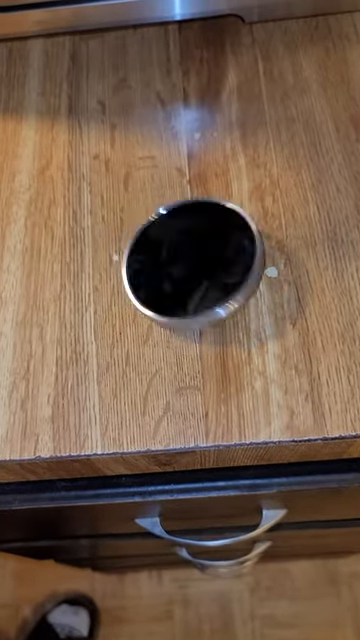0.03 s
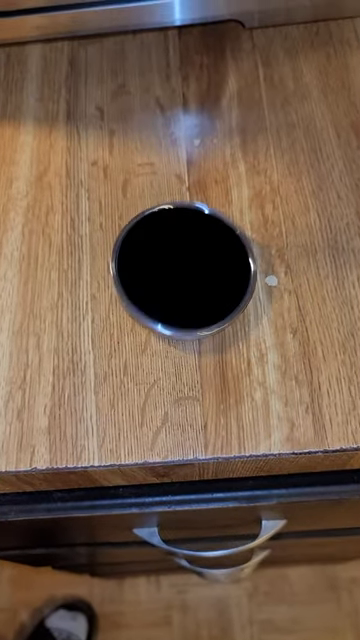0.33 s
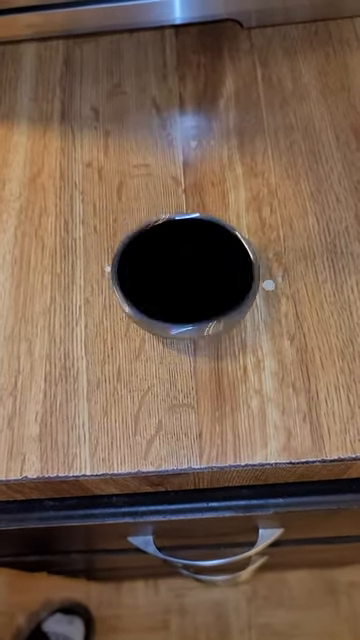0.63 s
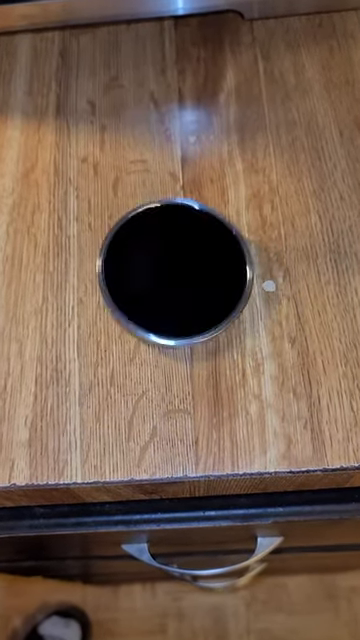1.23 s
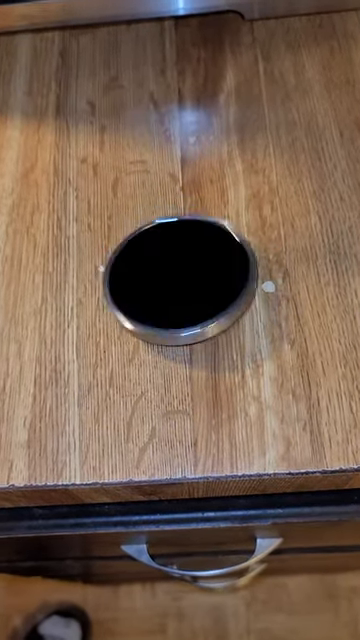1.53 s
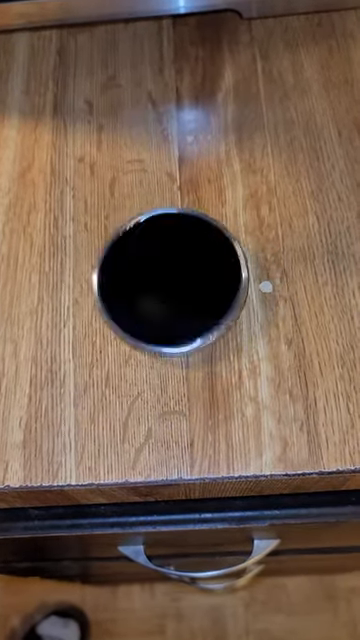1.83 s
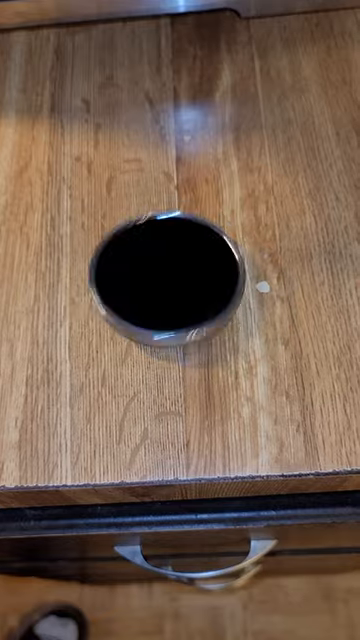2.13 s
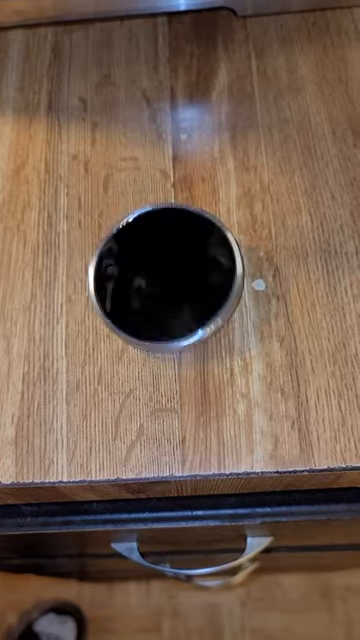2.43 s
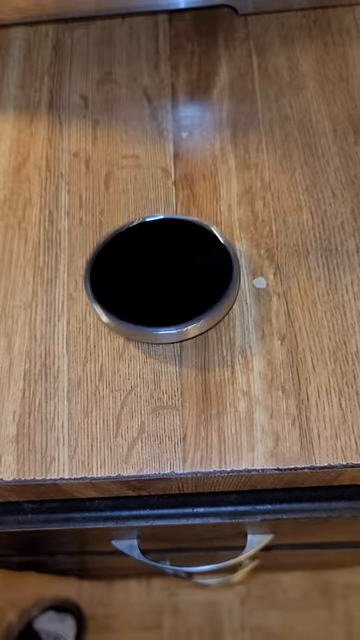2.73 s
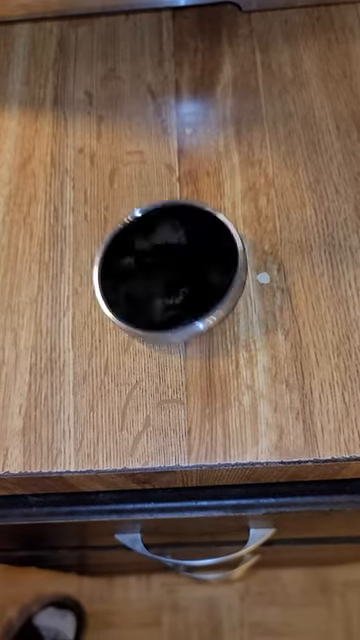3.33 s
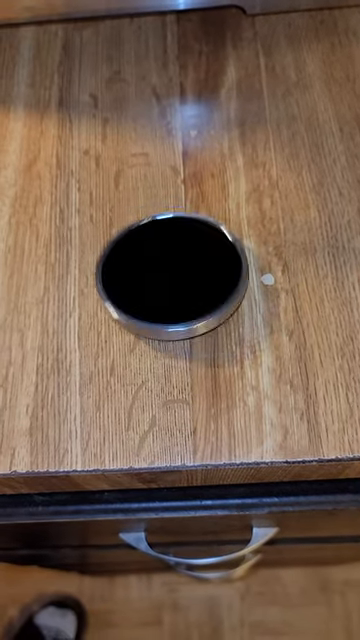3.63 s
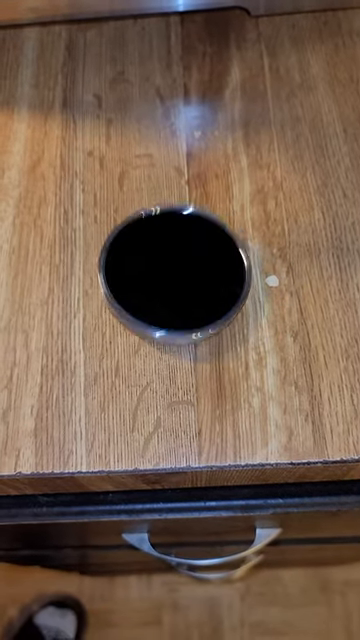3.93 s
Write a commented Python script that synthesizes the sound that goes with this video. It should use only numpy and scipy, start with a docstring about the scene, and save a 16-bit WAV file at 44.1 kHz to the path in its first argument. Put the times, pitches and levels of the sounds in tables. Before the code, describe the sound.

A heavy metal disc is already wobbling on its rim on a wooden cabinet top, grinding and ringing in about nine pulses a second. The rim knocks irregularly, brightest near 1.3 seconds and strongest near 2.1 seconds. The cabinet booms softly underneath, with a faint electrical hum in the quiet room. By 4 seconds the wobble has quickened to about ten pulses a second and is still going.

```python
"""Over the mains hum of a quiet room, a heavy metal disc is already wobbling round on its rim on a wooden
cabinet top, about nine laps a second. The contact point grinds over the grain and rings board and disc,
swelling and brightening on every lap, while the cabinet booms softly under the weight. Now and then the
rim knocks on a bump, brightest near 1.3 s and strongest near 2.1 s. By the end of the four seconds the
wobble has quickened to about ten laps a second."""
import sys
import numpy as np
from scipy import signal
from scipy.fft import rfft, irfft, next_fast_len
from scipy.io import wavfile
from scipy.ndimage import uniform_filter1d, minimum_filter1d, map_coordinates

SR = 44100
rng = np.random.default_rng(int(sys.argv[2]) if len(sys.argv) > 2 else 0)


def transcribe(signal):
    """Save signal, clipped to [-1, 1], as a 16-bit WAV file at the path in sys.argv[1]."""
    frames = np.atleast_2d(signal).T
    limited = np.clip(frames, -1, 1)
    pcm = np.round(limited * 32767).astype(np.int16)
    wavfile.write(sys.argv[1], SR, pcm)


N = 176400

# mains hum partials (frequency [Hz], level [dB])
HUM = [(119.9, -48.5), (239.8, -62)]
# room tone EQ (frequency [Hz], gain [dB])
AIR_EQ = [(30, 7.5), (200, -12), (1000, -15), (5000, -44), (15000, -40)]
# reverb decay (frequency [Hz], time to fall 60 dB [s])
REVERB_DECAY = [(200, 0.55), (1500, 0.35), (10000, 0.25)]
# envelope of the cabinet's boom (time [s], level [dB])
BOOM_ENVELOPE = [(0.0, -45.5), (0.49, -44.5), (0.51, -45), (1.12, -45), (1.19, -48.5), (1.7, -42),
                 (2.05, -52.5), (2.19, -39.5), (2.24, -49), (2.36, -38), (2.48, -62), (2.52, -43),
                 (3.36, -47.5), (3.4, -52), (3.44, -37), (3.5, -48), (3.95, -44), (4.0, -66)]
# tone of the boom (frequency [Hz], gain [dB])
BOOM_EQ = [(20, -22), (38, -13), (48, -13), (57, 3), (68, -8), (90, -13.5), (140, -20), (300, -31),
           (700, -46), (2000, -120)]
# broad tone of the rolling contact (frequency [Hz], gain [dB])
ROLL_EQ = [(40, -33), (150, -21.5), (230, -17), (400, -21.5), (580, -21.5), (720, -13), (790, -0.25),
           (1500, 0.35), (1850, -5), (2600, -22.5), (4600, -35), (6800, -35), (8000, -46), (15500, -56)]
# resonances of the wooden top (frequency [Hz], width [Hz], left boost [dB], right boost [dB])
BOARD_MODES = [(453.5, 120, 8.5, 13.5), (641, 107, 8.5, 13.5), (729, 17, -4, 6), (774.1, 29.6, 4.3, 9.5),
               (786, 10.5, 9.5, -0.5), (968, 42, 13.5, 4), (1072, 57, 1.5, 7.5), (1263, 75, 1, 7),
               (1346.5, 83, 4, 8), (1498, 122, 11, 6.5), (1681, 73, 5.5, -1), (1760, 24, -2.5, -20.5),
               (1821, 23, 10, 11), (2164, 86, 5.5, 4)]
# resonances of the disc (frequency [Hz], width [Hz], left boost [dB], right boost [dB])
DISC_MODES = [(2886, 95, 2.3, 12.6), (5178, 280, 8.5, 19.2), (8685, 150, 9, 14.5), (11200, 120, 21.3, 18)]
# the rim hits a bump (time [s], level [dB], hardness as treble boost [dB])
KNOCKS = [(.046, -5.5, -1.5), (0.1878, 4, 0), (.2875, 1.5, 0), (.3765, 0.5, -3.5), (.5135, 2, -2),
          (.639, 3.5, -5.5), (0.7151, 4, -6.5), (0.7316, 6.5, -3.5), (.742, 3, -2.5), (1.092, 4.5, 1.5),
          (1.1875, 6.5, 4), (1.29, 4.5, 7), (1.292, 8.5, 9.5), (1.296, -2, 1.5), (1.619, -1.5, -1),
          (1.6255, 4, 2.5), (1.7019, 6.5, -4), (1.728, 1.5, 4), (1.832, -4.5, 6), (1.937, -13, -2),
          (2.133, 11, -6), (2.141, 7, -3), (2.4675, 5.5, -4.5), (2.757, -1, 5.5), (2.985, 3.5, 3.5),
          (2.989, 1.5, -3.5), (3.394, 0, 1.5), (3.4765, 2.5, -1), (3.879, 4, -2), (3.9651, 1, 1.5)]
# tone of a knock (frequency [Hz], gain [dB])
KNOCK_EQ = [(300, -17), (620, -1), (850, -6), (1150, -5.5), (1500, 2.5), (2500, 4.5), (3500, -4.5),
            (6000, -7.5), (11200, -2), (16000, -3)]
# high shelf for hard knocks (frequency [Hz], share of the boost [0-1])
HARDNESS_SHELF = [(1500, 0), (2400, 1)]
# laps of the contact point (time of the peak [s], roll level [dB], grit level [dB])
LAPS = [(0.08, -2.5, -0.5), (0.192, -5.2, -3), (0.302, -1.5, 2.5), (0.414, -2.5, -1), (0.529, -3.5, 0),
        (0.643, -1.2, 1.2), (0.745, -0.5, -1), (0.86, -4, 0.5), (0.973, -1.5, -0.2), (1.09, -3.3, 0.5),
        (1.193, -2.3, 2), (1.303, -0.3, -0.5), (1.412, -4, -1), (1.524, 1, -1.5), (1.629, -3.7, -0.5),
        (1.732, 0.4, 2.5), (1.84, -3.7, 1), (1.951, 1.8, -2), (2.058, 2.1, -0.5), (2.164, 0.5, 1.3),
        (2.266, -3, -0.5), (2.364, 1.1, -0.5), (2.481, 0.6, -1.2), (2.585, 3.6, -0.5), (2.686, -4.8, 1),
        (2.782, -2.5, 0), (2.891, -1.6, 0), (2.994, -2.3, 1.2), (3.091, -2, 2), (3.187, -1.6, -0.3),
        (3.298, -1.2, -1), (3.397, 1.7, -1), (3.496, -0.4, 0.5), (3.59, -2.8, 0.5), (3.695, 0, -0.0),
        (3.799, -1.5, 1.5), (3.891, 0.5, 0.1), (3.987, -4, 4)]
# swell from the quiet side of a lap to the loud side (frequency [Hz], depth [dB])
SWELL = [(300, -1), (480, 6), (650, 0.5), (850, -1.5), (1120, 14.5), (1380, 11.5), (1720, 5), (2200, 21.5),
         (2650, 5), (5000, 13), (11000, 12)]
# resonances swept by each lap (quiet side [Hz], loud side [Hz], width [Hz], boost [dB])
SWEEPS = [(745, 1150, 42, 10), (1900, 1800, 94, 3.5), (5200, 5090, 140, 7.5)]
# stereo image of the grinding (frequency [Hz], left-right correlation [0-1])
STEREO_IMAGE = [(200, 0.68), (600, 0.3), (900, 0.91), (1600, 0.99), (2100, 0.07), (3500, 0.05),
                (7000, 0.15), (14000, 0)]

AIR_DB, BOOM_TRIM_DB, DISC_DB, REVERB_DB = -54, 3, -19.5, -15.5
ROUGH_DB, BUMPS_PER_S, PATCHY_DB = 1.35, 230, 2.5  # unevenness of the wood
SPECKS_PER_S, SPECK_SIZE = 120, 2.55  # size against the grinding
GRIT_LEAD_S, SWELL_SHARPNESS = 0.0044, 0.16  # the grit peaks ahead of the roll
SWEEP_CURVE = 1.27  # above 1 the sweeps linger on the quiet side
KNOCK_DB, SCRAPE_DECAY_S, KNOCK_SCRAPE, KNOCK_THUD = 24, 0.0029, 1.17, 0.81
LEFT_LAG_S = 0.00025  # the sound reaches the left microphone later


def amp(db):
    """Decibels to gain."""
    return 10 ** (np.asarray(db) / 20)


def unit(x):
    """Normalise to rms 1."""
    return x / np.sqrt(np.mean(x ** 2) + 1e-20)


def along(points, hz):
    """Read a curve on a log frequency axis."""
    f, v = np.transpose(points)
    return np.interp(np.log(hz + 1), np.log(f + 1), v)


def bell(hz, centre, width):
    """A resonance peak of height 1."""
    return 1 / (1 + (2 * (hz - centre) / width) ** 2)


def smooth_noise(rate):
    """A smooth random curve, rate knots a second."""
    return map_coordinates(rng.standard_normal(N // 8), [np.arange(N) * rate / SR], mode="wrap")


def filtered(x, response):
    """Run x through a frequency response."""
    size = 2 * next_fast_len(N // 2 + SR // 4)
    return irfft(rfft(x, size) * response(np.fft.rfftfreq(size, 1 / SR)), size)[..., :N]


def minimum_phase(gain):
    """The response with this gain that rings only after a hit."""
    cepstrum = irfft(np.log(np.maximum(gain, 1e-6)))
    half = cepstrum.shape[-1] // 2
    cepstrum[..., 1:half] *= 2
    cepstrum[..., half + 1:] = 0
    return np.exp(rfft(cepstrum))


def room_tone():
    """A steady bed of mains hum and faint air."""
    t = np.arange(N) / SR
    hum = sum(amp(db) * np.sqrt(2) * np.sin(2 * np.pi * (hz * t + rng.random())) for hz, db in HUM)
    air = unit(filtered(rng.standard_normal((2, N)), lambda hz: amp(along(AIR_EQ, hz))))
    return hum + amp(AIR_DB) * air


def reverb(x):
    """The room's short stereo tail, the highs dying first."""
    hz, t, noise = signal.stft(rng.standard_normal((2, SR // 2)), SR, nperseg=256)
    decay = amp(-60 * t / along(REVERB_DECAY, hz)[:, None])
    tail = signal.istft(noise * decay, SR, nperseg=256)[1]
    return signal.fftconvolve(x, tail / np.linalg.norm(tail[0]), axes=1)[:, :N]


def cabinet_boom():
    """The low end: the cabinet's lowest resonance, shaken by the rolling weight."""
    times, db = np.transpose(BOOM_ENVELOPE)
    rumble = unit(filtered(rng.standard_normal(N), lambda hz: amp(along(BOOM_EQ, hz))))
    return rumble * amp(BOOM_TRIM_DB + np.interp(np.arange(N) / SR, times, db))


def board_and_disc(hz):
    """The ringing response of wood and metal at each microphone."""
    boost_db = sum(np.array([[left], [right]]) * bell(hz, centre, width)
                   for centre, width, left, right in [*BOARD_MODES, *DISC_MODES])
    gain = amp(along(ROLL_EQ, hz) + boost_db)
    ring_phase = np.angle(minimum_phase(np.sqrt(gain[0] * gain[1])))
    lag_phase = np.array([[-1], [1]]) * np.pi * hz * LEFT_LAG_S
    return gain * np.exp(1j * (ring_phase + lag_phase))


def rim_knocks():
    """The rim hits bumps, each a thud with a little scrape; harder hits are brighter."""
    out, t = np.zeros(N + SR), np.arange(SR // 10) / SR
    hz = np.fft.rfftfreq(len(t), 1 / SR)
    for start, db, hard_db in KNOCKS:
        scrape = rng.standard_normal(len(t)) * np.exp(-t / SCRAPE_DECAY_S)
        hit = KNOCK_SCRAPE * scrape / np.linalg.norm(scrape) + KNOCK_THUD * (t == 0)
        tone = minimum_phase(amp(along(KNOCK_EQ, hz) + hard_db * along(HARDNESS_SHELF, hz)))
        out[round(start * SR):][:len(t)] += amp(db + KNOCK_DB) * irfft(rfft(hit) * tone)
    return out[:N]


def lap_motion(hz, t):
    """Gain in dB as the contact point circles: each lap swells and sweeps the resonances."""
    peaks, roll_db, grit_db = np.transpose(LAPS)
    grit = along([(1500, 0.36), (6000, 0.85)], hz)  # the grit's share grows with frequency
    level = (1 - grit) * np.interp(t, peaks, roll_db) + grit * np.interp(t, peaks, grit_db)
    padded = np.r_[2 * peaks[0] - peaks[1], peaks, 2 * peaks[-1] - peaks[-2]]
    laps = np.interp(t + GRIT_LEAD_S * (grit - .5), padded, np.arange(len(padded)))
    angle = 2 * np.pi * laps  # zero on the loud side
    swell = along(SWELL, hz) * (np.cos(angle) + SWELL_SHARPNESS * np.cos(2 * angle)) / 2
    arch = ((1 + np.cos(angle)) / 2) ** SWEEP_CURVE
    sweep = sum(db * bell(hz, quiet + (loud - quiet) * arch, width) for quiet, loud, width, db in SWEEPS)
    return level + swell + sweep


def rim_grinding():
    """The rim's force on grain and specks: a gritty texture that pulses with the laps."""
    grain = unit(rng.standard_normal((2, N)) * amp(ROUGH_DB * smooth_noise(BUMPS_PER_S)))
    specks = SPECK_SIZE * rng.standard_normal((2, N)) * (rng.random(N) < SPECKS_PER_S / SR)
    hz, t, (mid, side) = signal.stft(grain + specks, SR, nperseg=512, noverlap=384)
    hz = hz[:, None]
    spread = np.arccos(np.clip(along(STEREO_IMAGE, hz), 0, 1)) / 2
    stereo = np.array([np.cos(spread) * mid + sign * np.sin(spread) * side for sign in (1, -1)])
    patches = uniform_filter1d(rng.standard_normal(mid.shape), size=3, axis=0)
    patches = unit(uniform_filter1d(patches, size=8, axis=1))
    gain = amp(lap_motion(hz, t) + PATCHY_DB * patches)
    gain /= np.sqrt(np.mean(gain ** 2, axis=1, keepdims=True))  # each band keeps its mean power
    return signal.istft(stereo * gain, SR, nperseg=512, noverlap=384)[1][:, :N]


def scene():
    """The mix: the disc up front, with reverb, boom and room tone under it."""
    disc = amp(DISC_DB) * unit(filtered(rim_grinding() + rim_knocks(), board_and_disc))
    return disc + amp(REVERB_DB) * reverb(disc) + cabinet_boom() + room_tone()


def record(dry):
    """A fast limiter ducks the hardest peaks, then a steep low-pass trims the top."""
    ceiling_db, limiter_s, cutoff_hz = -1.1, .002, 15830
    span = int(limiter_s * SR)
    needed = np.minimum(1, amp(ceiling_db) / (np.abs(dry).max(axis=0) + 1e-9))
    gain = uniform_filter1d(minimum_filter1d(needed, 2 * span + 1), span)
    return filtered(dry * gain, lambda hz: hz < cutoff_hz)


dry = scene()
out = record(dry)
transcribe(out)
```